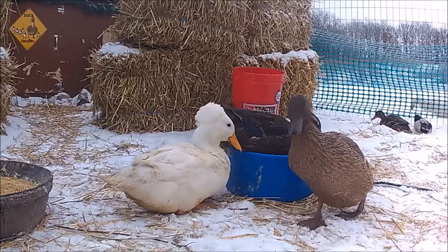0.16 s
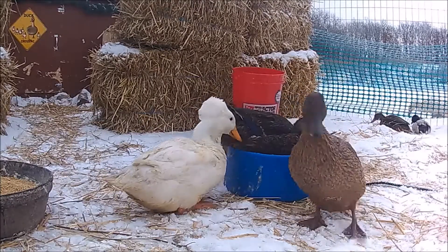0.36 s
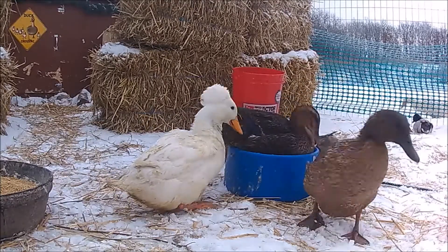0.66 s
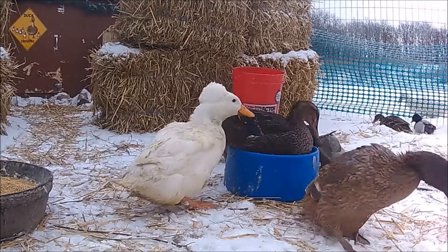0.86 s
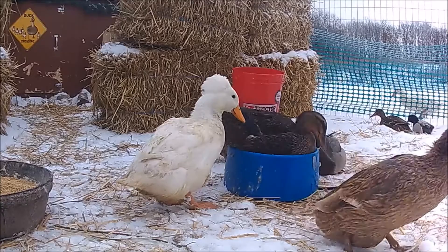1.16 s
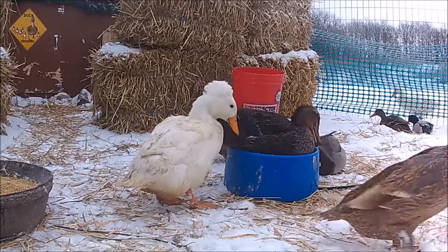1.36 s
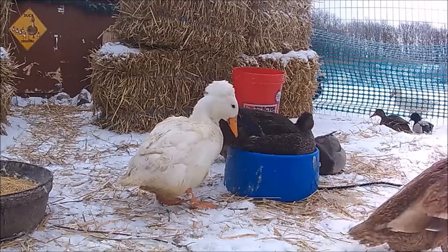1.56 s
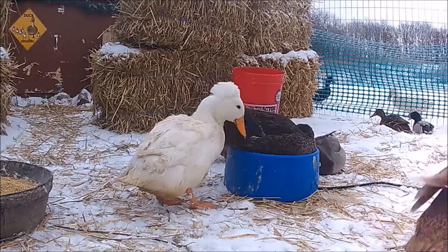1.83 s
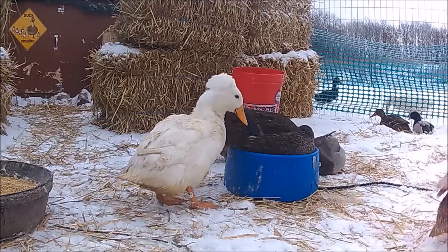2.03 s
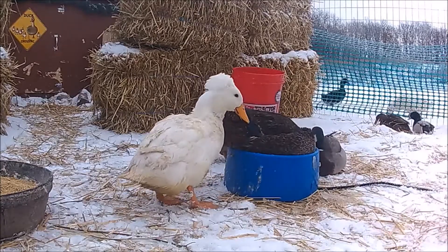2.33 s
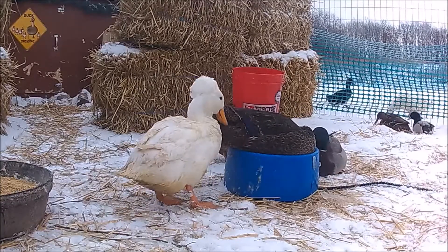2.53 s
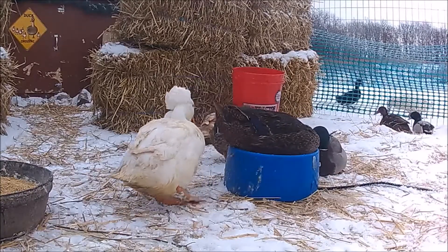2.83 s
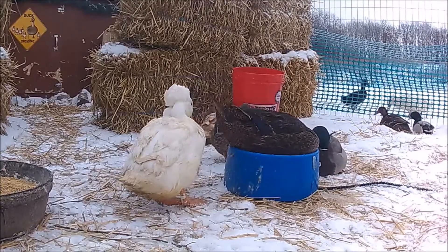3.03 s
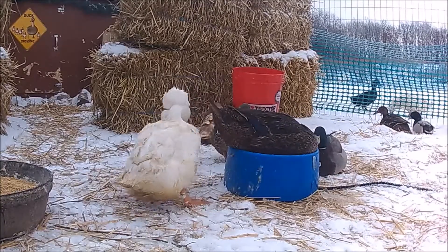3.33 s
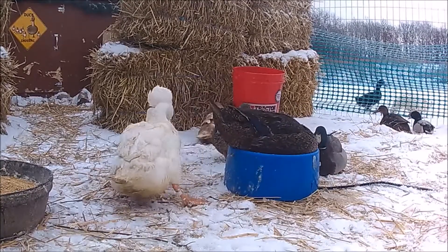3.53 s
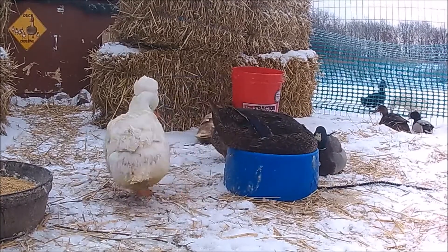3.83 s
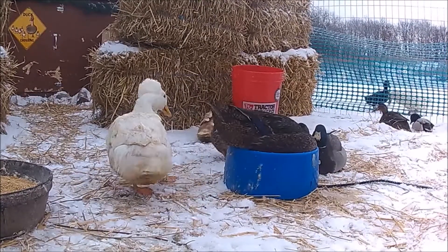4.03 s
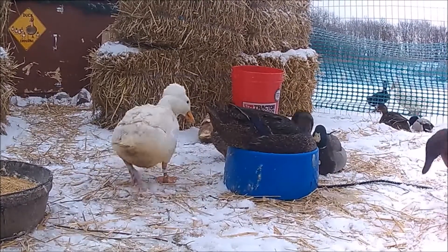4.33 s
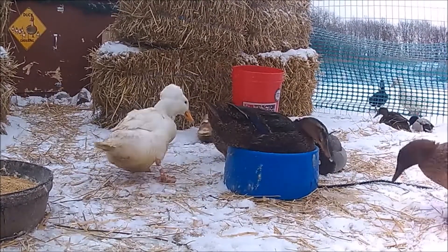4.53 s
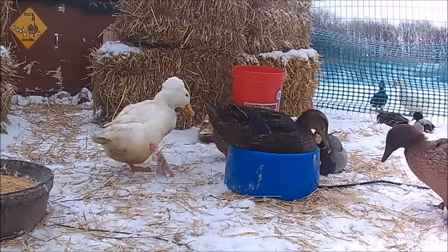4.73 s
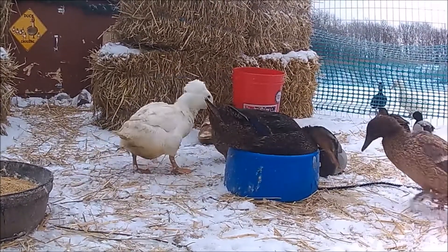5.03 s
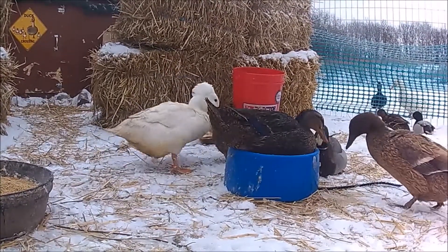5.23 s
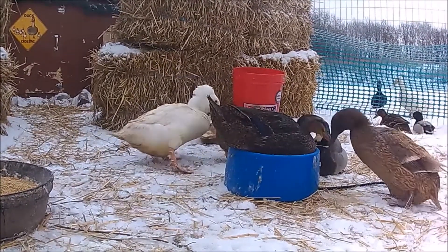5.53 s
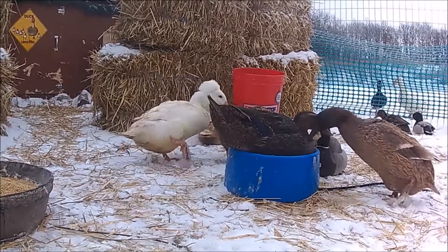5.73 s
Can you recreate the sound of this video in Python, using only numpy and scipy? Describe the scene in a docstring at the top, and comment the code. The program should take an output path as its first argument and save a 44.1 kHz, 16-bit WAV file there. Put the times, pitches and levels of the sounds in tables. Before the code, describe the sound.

A duck gives a short squeal, then a long whistled one that trembles, turns raspy and clears, amid creaky duck clucks and hard taps.

```python
"""One duck gives a long whistled squeal that trembles, turns raspy, swells clean and sinks away, after a short one:
harmonics picked by a throat resonance, beside rasp noise and a second voice. Ducks around it chatter in short
creaky clucks, pulse trains ringing throat and chest, with thin arching chirps. Hard taps land close to the
microphone, one faint and two sharp; crackling hiss comes in bouts of random ringing grains, with a few small clicks.
The far flock murmurs as fluttering noise over a faint hum and low rumble; the pen's echo is short and weak."""
import sys
import numpy as np
from scipy import signal
from scipy.fft import rfft, irfft, next_fast_len
from scipy.io import wavfile
from scipy.ndimage import map_coordinates

SR = 44100
rng = np.random.default_rng(int(sys.argv[2]) if len(sys.argv) > 2 else 0)


def waveform_to_disk(signal):
    """Save audio, clipped to [-1, 1], as 16-bit WAV at the path in sys.argv[1]."""
    frames = np.transpose(np.atleast_2d(signal))
    scaled = np.clip(frames, -1, 1) * 32767
    samples = np.round(scaled).astype(np.int16)
    wavfile.write(sys.argv[1], SR, samples)


N = 259749
TOP_HZ = 15900

# far flock spectrum: freq_hz, relative_db
FLOCK_SPECTRUM = [(59, -43), (100, -8.5), (398, -7), (801, -4.5), (991, -7.5), (1130, 1.5), (1230, 6),
                  (2220, 3.5), (2860, 0), (5080, -29), (5770, -62.5), (8280, -43.5), (10200, -27.5),
                  (13500, -27), (16000, -32)]
# rumble spectrum: freq_hz, relative_db
RUMBLE_SPECTRUM = [(20, -5.5), (45, -5), (60, 5), (80, -8.5), (150, -19.5), (300, -51.5)]
# faint low hum: freq_hz, level_db
HUM = (58, -78)
# late rumble swell: start_s, attack_s, hold_s, release_s
RUMBLE_SWELL = (4.2, .8, 1, .5)
FLOCK_START_DB, FLOCK_GROWS_DB_PER_S = -58.5, 0.59
RUMBLE_DB, RUMBLE_SWELL_DB = -83, 10.5

# echo of bales and shed: freq_hz, t60_s
PEN_DECAY = [(200, 0.22), (1800, 0.28), (6000, 0.12)]

# bouts of crackling hiss: start_s, hold_s, level_db
HISS_BOUTS = [(2.218, .6, -60), (3.24, 0.21, -51.5), (3.646, .24, -65.5), (4.059, 0.035, -61.5),
              (4.27, 0.063, -61), (4.942, .05, -67), (5.268, 0.048, -58)]
# small single clicks: start_s, peak_db
CLICKS = [(3.474, -39.5), (3.558, -29.5), (4.196, -37), (5.285, -40.5), (5.341, -35), (5.363, -31)]
# resonance of grains and clicks: freq_hz, relative_db
GRAIN_RESONANCE = [(1200, -21.5), (2200, 0), (3000, 5), (3700, -6), (4300, -8), (5200, -16.5),
                   (6200, -41.5), (8000, -39.5), (11000, -27.5), (15500, -29.5)]
BOUT_ATTACK_S, BOUT_RELEASE_S = .012, 0.16
HISS_FLOOR_DB = -71  # the hiss never falls silent

# close taps: start_s, level_db, rattle_t60_s, thump_level_db
TAPS = [(4.3145, -30, 0.051, -64), (4.3599, -1.5, 0.014, -41), (4.6331, 0.5, 0.015, -25)]
# struck body resonance: freq_hz, relative_db
TAP_RESONANCE = [(30, -43.5), (150, -13), (380, -8.5), (950, -9.5), (1350, 3), (1600, -3.5), (2000, -6),
                 (2800, 2), (3500, -6.5), (4600, -12), (5600, -35), (8000, -50), (10500, -37),
                 (15500, -41.5)]
# contacts within a tap: delay_s, level_db
BOUNCE = [(0, -5.5), (.0015, -8.5), (.0026, -11)]

# near clucks: loudest_s, peak_db (throat part), rise_s, fall_s, throat_hz
CLUCKS = [(0.006, -22.5, .003, .009, 1810), (0.1, -33.5, 0.024, .019, 1980),
          (0.271, -32.5, 0.0047, 0.013, 1610), (0.364, -36, .053, 0.026, 1528),
          (0.555, -43.5, 0.012, .009, 1640), (0.719, -15.5, 0.018, 0.0056, 1732),
          (0.856, -21, 0.0091, .004, 1748), (1.098, -21.5, 0.023, 0.0099, 1828),
          (1.192, -13.5, 0.024, .004, 1841), (1.243, -16.5, 0.025, .013, 1670),
          (1.304, -12.5, 0.029, .008, 1763), (1.43, -16, 0.013, 0.019, 1826),
          (1.516, -16.5, .019, .007, 1715), (1.938, -10, 0.039, .007, 1750),
          (2.135, -13.5, 0.013, .009, 1645), (2.358, -9.5, .032, 0.005, 1834),
          (4.082, -21, 0.019, 0.016, 1617), (4.106, -19.5, 0.0098, .018, 1682),
          (4.219, -17.5, .014, .004, 1830), (4.315, -21, .003, 0.026, 1498),
          (4.477, -30, 0.044, .008, 1560), (4.492, -21.5, 0.0044, 0.0031, 1814),
          (4.551, -30.5, .004, .005, 2030), (4.629, -17, .034, 0.028, 1734),
          (4.663, -11.5, 0.028, .01, 1965), (4.795, -19, 0.0076, 0.014, 1854),
          (4.924, -20, 0.014, .035, 1799), (4.994, -16, 0.023, .016, 1850), (5.172, -11, .027, 0.011, 1810),
          (5.317, -23, 0.026, 0.0049, 1800), (5.441, -34, .002, .011, 2015),
          (5.473, -19, .022, 0.014, 1949), (5.636, -29, 0.035, 0.06, 1710), (5.886, -26, .021, .003, 1730)]
# thin murmurs, nearly all throat: loudest_s, peak_db (throat part), rise_s, fall_s, throat_hz
MURMURS = [(5.215, -29, .017, 0.02, 1803), (5.272, -30, 0.045, 0.068, 1551),
           (5.362, -30.5, 0.025, 0.011, 1876), (5.553, -29, 0.03, .035, 1891)]
# throat resonance at THROAT_HZ: freq_hz, relative_db
THROAT_RESONANCE = [(700, -40), (1000, -37), (1250, -12.5), (1750, 2.5), (2150, -1.5), (2500, -14),
                    (3200, -36), (5000, -51.5), (6000, -77.5)]
# chest resonance: freq_hz, relative_db
CHEST_RESONANCE = [(60, -24), (150, -13), (260, -1), (420, -3.5), (700, 5), (1000, 3), (1500, -43)]
THROAT_HZ = 1844.5
# chest re throat in a cluck of CLUCK_DB; dB less per dB louder; dB more per Hz of higher throat
CLUCK_DB, CHEST_DB, CHEST_FADES_DB_PER_DB, CHEST_DB_PER_HZ = -20, -18.5, 0.67, 0.0227
MURMUR_CHEST_DB = -34
# creak at THROAT_HZ; power by which a higher throat slows it; log-normal spread
PULSES_PER_S, PULSE_SLOWS_POWER, PULSE_SCATTER = 210, 1.4, .04
# soft scattered clucks; the rise and fall also serve the leads
SOFT_PER_S, SOFT_DB, SOFT_RISE_S, SOFT_FALL_S, SOFT_HZ = 3.5, -40.5, 0.0064, 0.0052, 1830
# a soft cluck this much earlier and weaker leads each cluck rising faster than ABRUPT_S
LEAD_S, LEAD_DB, ABRUPT_S = .033, -22.5, 0.023

# thin arching chirps: middle_s, length_s, top_hz, sag_share, level_db
CHIRPS = [(1.21, .034, 1810, 0.24, -44), (1.495, .036, 1785, 0.23, -43.5), (1.504, 0.023, 2070, 0.3, -37),
          (1.742, 0.044, 2113, 0.3, -37), (2.108, 0.047, 2332, 0.5, -37.5), (2.125, 0.015, 1808, .15, -25)]

# whistle level, short squeal: time_s, level_db
SHORT_LEVEL = [(1.73, -38.5), (1.752, -40.5), (1.772, -27.5), (1.915, -25)]
# whistle level, long squeal: time_s, level_db
LONG_LEVEL = [(2.15, -34), (2.154, -36.5), (2.186, -19), (2.3, -25.5), (2.312, -18.5), (2.35, -19),
              (2.462, -24.5), (2.604, -23.5), (2.918, -40.5), (2.938, -31), (2.994, -26), (3.156, -25.5),
              (3.24, -17), (3.456, -14.5), (3.524, -16), (3.594, -30), (3.65, -49)]
# whistle level, hoarse end of the long squeal: time_s, level_db
END_LEVEL = [(3.68, -38), (3.708, -34), (3.802, -40.5), (3.884, -23.5), (3.948, -37.5), (3.96, -38.5)]
# short squeal pitch: time_s, pitch_hz
SHORT_PITCH = [(1.73, 560), (1.755, 622), (1.77, 700.3), (1.915, 720.5)]
# long squeal pitch: time_s, pitch_hz
LONG_PITCH = [(2.17, 737.8), (2.208, 756.7), (2.26, 834.9), (2.314, 737.0), (2.534, 762.9), (2.688, 760.6),
              (2.782, 775.4), (2.864, 748.3), (3.202, 732.4), (3.52, 709.5), (3.58, 691.5)]
# pitch as the voice breaks and sags: time_s, pitch_hz
END_PITCH = [(3.6, 652), (3.7, 592), (3.786, 556), (3.826, 509), (3.872, 487)]
# resonance that picks one harmonic: freq_hz, relative_db
WHISTLE_RESONANCE = [(900, -36), (1150, 12), (1400, 23), (1600, 12.5), (1750, 7.5), (2000, -60)]
# harmonic just above the whistle: freq_hz, relative_db
OVERTONE_RESONANCE = [(1650, -48.5), (1950, 7.5), (2300, 6), (2550, -9.5), (2800, -51)]
# reedy top of a pressed voice: freq_hz, relative_db
REEDY_RESONANCE = [(2400, -47), (2950, 1.5), (3300, -6), (3750, -7), (4500, -14), (5200, -10), (5500, -54)]
# rasp spectrum: freq_hz, relative_db
RASP_SPECTRUM = [(500, -49.5), (950, -25), (1200, -12.5), (1450, 6.5), (1650, -9), (2000, -6), (2400, -29),
                 (3200, -23), (4300, -43.5), (5200, -48), (6000, -75)]
# trembling rate: time_s, beats_per_s
TREMBLE = [(2.42, 45), (2.48, 41), (2.52, 34), (2.6, 32), (2.65, 36), (2.72, 30)]
TREMBLE_CREST_S = 2.55
# moments when the voice cracks: middle_s, added_rasp_share
CRACKS = [(1.92, .25), (2.156, 1), (2.25, .15), (2.293, 0.4), (3.36, 0.16), (3.928, 0.75)]
CRACK_S = 0.016
# stages of the long squeal, each: start_s, attack_s, hold_s, release_s
PRESSED = (2.14, 0.023, 0.68, 0.054)
TREMBLING = (2.38, .15, .17, 0.13)
TWO_VOICED = (2.69, .09, .01, 0.017)
# stage free of background quiver: start_s, attack_s, hold_s, release_s
CLEAN_SWELL = (2.8, .1, 0.59, .05)
# harmonics beside the whistle, each: level_db (whistle at WHISTLE_DB), db_per_whistle_db, pressed_db
FUNDAMENTAL = (-54.5, 0.049, 9.3)
OVERTONE = (-47, 0.38, -9.5)
WHISTLE_DB = -25
# clean while a harmonic lies within LOCK_WIDTH (harmonic spacings) of the throat's pitch
THROAT_LOCK_HZ, LOCK_WIDTH, LOCK_EDGE = 1472, .21, .14
# rasp shares: always present, added when unlocked, by the tremble, by the second voice
CLEAN_RASP, FULL_RASP, TREMBLE_RASP, TWO_VOICED_RASP = .006, 0.95, .16, 0.52
# tremble depth; least depth outside the clean swell; second voice alone and while trembling
TREMBLE_DEPTH, QUIVER_DEPTH, SECOND_VOICE, TREMBLE_SECOND = 0.63, 0.19, 1, 0.12
# above STRAIN_HZ and below SLACK_HZ the harmonics beside the whistle fade
STRAIN_HZ, STRAIN_DB_PER_HZ = 817, 1.3
SLACK_HZ, SLACK_DB_PER_HZ = 576, 1.5


def amp(db):
    """Decibels to gain."""
    return 10 ** (np.asarray(db) / 20)


def unit(x):
    """Scale to rms 1."""
    return x / np.sqrt(np.mean(x ** 2) + 1e-20)


def along(points, hz):
    """Read (freq_hz, value) points on a log axis."""
    freq_hz, values = np.transpose(points)
    return np.interp(np.log(hz + 1), np.log(freq_hz + 1), values)


def curves(rows):
    """One value per sample for each column after the time."""
    time_s, *columns = np.transpose(rows)
    return [np.interp(np.arange(N) / SR, time_s, column) for column in columns]


def wobble(knots_per_s):
    """Smooth random curve."""
    knots = rng.standard_normal(int(N * knots_per_s / SR) + 4)
    return map_coordinates(knots, [np.arange(N) * knots_per_s / SR])


def envelope(start_s, attack_s, hold_s, release_s):
    """Rise to 1, stay, fall back to 0."""
    t = np.arange(N) / SR - start_s
    return np.clip(np.minimum(t / attack_s, 1 - (t - attack_s - hold_s) / release_s), 0, 1)


def filtered(x, response):
    """Multiply the spectrum of x by a response of frequency."""
    size = next_fast_len(N + SR // 2)
    return irfft(rfft(x, size) * response(np.fft.rfftfreq(size, 1 / SR)), size)[:N]


def noise(spectrum):
    """Coloured noise of rms 1."""
    return unit(filtered(rng.standard_normal(N), lambda hz: amp(along(spectrum, hz))))


def ring(spectrum, shift=1, size=2048):
    """Minimum-phase answer of a body to one impulse, with peak 1."""
    hz = np.fft.rfftfreq(size, 1 / SR) / shift
    cepstrum = irfft(np.log(amp(along(spectrum, hz))))
    # folding the cepstrum makes the answer causal
    cepstrum[1:size // 2] *= 2
    cepstrum[size // 2 + 1:] = 0
    answer = irfft(np.exp(rfft(cepstrum)))
    return answer / np.abs(answer).max()


def add(track, start_s, sound):
    """Mix a sound into the track."""
    start = round(start_s * SR)
    lo, hi = max(start, 0), min(start + len(sound), N)
    if hi > lo:
        track[lo:hi] += sound[lo - start:hi - start]


def background(flutter_db):
    """Far flock as fluttering noise that slowly livens up, a faint hum, and a rumble that swells late."""
    t = np.arange(N) / SR
    flock_db = FLOCK_START_DB + FLOCK_GROWS_DB_PER_S * t + flutter_db * wobble(23)
    flock = amp(flock_db) * noise(FLOCK_SPECTRUM)
    hum_hz, hum_db = HUM
    hum = amp(hum_db) * np.sqrt(2) * np.sin(2 * np.pi * hum_hz * t)
    rumble_db = RUMBLE_DB + RUMBLE_SWELL_DB * envelope(*RUMBLE_SWELL)
    return flock + hum + amp(rumble_db) * noise(RUMBLE_SPECTRUM)


def pen_echo(x):
    """Short echo, 10 ms late, in which each frequency dies at its own speed."""
    hz, t, cells = signal.stft(rng.standard_normal(SR // 2), SR, nperseg=256)
    decay = amp(-60 * t / along(PEN_DECAY, hz)[:, None])
    tail = signal.istft(cells * decay, SR, nperseg=256)[1]
    delayed = np.pad(x, (SR // 100, 0))
    return signal.fftconvolve(delayed, tail / np.linalg.norm(tail))[:N]


def crackling_hiss(grains_per_s, clump_db):
    """Random impulses, clumped in level, ring a resonance in bouts; a few small clicks share it."""
    grains = (rng.random(N) < grains_per_s / SR) * rng.standard_normal(N)
    grain_ring = ring(GRAIN_RESONANCE)
    bouts = [amp(level_db) * envelope(start_s, BOUT_ATTACK_S, hold_s, BOUT_RELEASE_S)
             for start_s, hold_s, level_db in HISS_BOUTS]
    level = np.maximum(np.max(bouts, axis=0), amp(HISS_FLOOR_DB))
    crackle = unit(signal.fftconvolve(grains * amp(clump_db * wobble(35)), grain_ring)[:N])
    out = crackle * level
    for start_s, peak_db in CLICKS:
        add(out, start_s, amp(peak_db) * grain_ring)
    return out


def taps(rattle_db, thump_s):
    """Hard bouncing contacts and a decaying rattle ring a struck body; each adds a low push of air."""
    out, t, body = np.zeros(N), np.arange(SR // 20) / SR, ring(TAP_RESONANCE)
    for start_s, level_db, rattle_t60_s, thump_db in TAPS:
        blow = amp(rattle_db - 60 * t / rattle_t60_s) * rng.standard_normal(len(t))
        for delay_s, contact_db in BOUNCE:
            blow[round(abs(delay_s) * SR)] += amp(contact_db)
        tap = signal.fftconvolve(blow, body)
        tap *= np.linalg.norm(body) / np.linalg.norm(tap)  # same energy as the body's ring
        add(out, start_s, amp(level_db) * np.sqrt(2) * tap)
        u = t / thump_s
        add(out, start_s, amp(thump_db) * u * (2 - u) * np.exp(-u))
    return out


def chirps(quaver):
    """Each chirp arches up and down in pitch as it swells and fades."""
    out, waver = np.zeros(N), wobble(700)
    for middle_s, length_s, top_hz, sag, level_db in CHIRPS:
        u = np.linspace(-1, 1, round(length_s * SR))
        pitch_hz = top_hz * (1 - sag * u ** 2 + quaver * waver[round(middle_s * SR):][:len(u)])
        tone = np.cos(np.pi * u / 2) * np.sin(2 * np.pi * np.cumsum(pitch_hz) / SR)
        add(out, middle_s - length_s / 2, amp(level_db) * np.sqrt(2) * tone)
    return out


def cluck_pulses(rise_s, fall_s, pulses_per_s, edge_db, puff_db, puff_t60_s):
    """Snaps of the syrinx that swell to a central one and fade; each trails a short noisy puff."""
    chance = rng.standard_normal((2, 64))
    before, after = min(int(rise_s * pulses_per_s), 31), min(int(fall_s * pulses_per_s), 31)
    k = np.arange(-before, after + 1)
    # the central pulse (k = 0) has no scatter
    when_s = (k + .06 * chance[0, k] * (k != 0)) / pulses_per_s
    scatter_db = 1.6 * chance[1, k] * (k != 0)
    edge = np.abs(when_s / np.where(k < 0, rise_s, fall_s)) ** 1.63
    train = np.zeros(SR // 4)
    place = np.round(when_s * SR).astype(int) + SR // 8
    train[np.clip(place, 0, len(train) - 1)] = amp(scatter_db - edge_db * edge)
    t = np.arange(SR // 50) / SR
    puff = signal.fftconvolve(train, amp(-60 * t / puff_t60_s))[:len(train)]
    return train + amp(puff_db) * puff * rng.standard_normal(len(train))


def cluck(peak_db, rise_s, fall_s, throat_hz, chest_db):
    """A pulse train rings the throat, and more weakly the chest; a higher throat creaks more slowly."""
    slowing = (THROAT_HZ / throat_hz) ** PULSE_SLOWS_POWER
    rate = PULSES_PER_S * slowing * np.exp(PULSE_SCATTER * rng.standard_normal())
    train = cluck_pulses(rise_s, fall_s, rate, edge_db=14.0, puff_db=-19, puff_t60_s=0.021)
    throat = signal.fftconvolve(train, ring(THROAT_RESONANCE, throat_hz / THROAT_HZ))
    chest = unit(signal.fftconvolve(train, ring(CHEST_RESONANCE))) * throat.std() * amp(chest_db)
    return amp(peak_db) * (throat + chest) / np.abs(throat).max()


def soft_clucks():
    """Rows of faint clucks: one leads each abrupt cluck, others come at jittered intervals."""
    rows = [(loudest_s - LEAD_S, peak_db + LEAD_DB, SOFT_RISE_S, SOFT_FALL_S, throat_hz)
            for loudest_s, peak_db, rise_s, _, throat_hz in CLUCKS if rise_s < ABRUPT_S]
    chance = rng.uniform(-1, 1, (64, 3))
    for i, (u, v, w) in enumerate(chance):
        if i < np.floor(SOFT_PER_S * N / SR):
            loudest_s, throat_hz = (i + u / 2) / SOFT_PER_S, SOFT_HZ * (1 + 0.033 * w)
            rows.append((loudest_s, SOFT_DB + 3 * v, SOFT_RISE_S, SOFT_FALL_S, throat_hz))
    return rows


def clucks():
    """Near ducks' chatter; the softer a cluck, the larger its share of chest."""
    out, middle_s = np.zeros(N), 1 / 8 + .0004  # central pulse, plus the throat's lag
    for loudest_s, peak_db, rise_s, fall_s, throat_hz in CLUCKS + soft_clucks():
        chest_db = CHEST_DB - CHEST_FADES_DB_PER_DB * (peak_db - CLUCK_DB)
        chest_db += CHEST_DB_PER_HZ * (throat_hz - THROAT_HZ)
        add(out, loudest_s - middle_s, cluck(peak_db, rise_s, fall_s, throat_hz, chest_db))
    for loudest_s, *shape in MURMURS:
        add(out, loudest_s - middle_s, cluck(*shape, MURMUR_CHEST_DB))
    return out


def hoarseness(pitch_hz, unsteady):
    """Share of rasp: high when no harmonic fits the throat or in a crack, raised by unsteadiness."""
    t, harmonic = np.arange(N) / SR, THROAT_LOCK_HZ / pitch_hz
    miss = np.abs(harmonic - np.round(harmonic))
    unlocked = np.clip((miss - LOCK_WIDTH) / LOCK_EDGE, 0, 1)
    cracks = sum(share * np.exp(-((t - middle_s) / CRACK_S) ** 2) for middle_s, share in CRACKS)
    return np.clip(CLEAN_RASP + FULL_RASP * unlocked + unsteady + cracks, 0, .98)


def squeal(level_rows, second_hz, jitter, vibrato, flicker_db, rasp_db, overtone_db, reedy_db):
    """A throat picks out one harmonic of a high voice; the other side of the syrinx beats against it."""
    t = np.arange(N) / SR
    pitch_hz, = curves(SHORT_PITCH + LONG_PITCH + END_PITCH)
    whistle_db, = curves(level_rows)
    press, trembling, two_voiced = envelope(*PRESSED), envelope(*TREMBLING), envelope(*TWO_VOICED)

    thinning_db = SLACK_DB_PER_HZ * np.maximum(SLACK_HZ - pitch_hz, 0)
    thinning_db += STRAIN_DB_PER_HZ * np.maximum(pitch_hz - STRAIN_HZ, 0)
    low_db, high_db = [level_db + follows * (whistle_db - WHISTLE_DB) + pressed_db * press - thinning_db
                       for level_db, follows, pressed_db in (FUNDAMENTAL, OVERTONE)]
    quiver = QUIVER_DEPTH * (1 - envelope(*CLEAN_SWELL))
    depth = np.clip(np.maximum(TREMBLE_DEPTH * trembling, quiver), 0, 1)
    rasp = hoarseness(pitch_hz, TREMBLE_RASP * trembling + TWO_VOICED_RASP * two_voiced)
    clean = np.sqrt(1 - rasp ** 2)
    second = np.maximum(SECOND_VOICE * two_voiced, TREMBLE_SECOND * trembling)
    first_s, last_s = level_rows[0][0], level_rows[-1][0]
    gate = np.clip(np.minimum(t - first_s, last_s - t) / 0.0025, 0, 1)
    on = gate > 0

    # once a beat the voice chokes briefly, bends in pitch and lets the rasp through
    beats = np.cumsum(curves(TREMBLE)[0]) / SR
    turn = 2 * np.pi * (beats - np.interp(TREMBLE_CREST_S, t, beats))
    dip = np.sin(turn / 2) ** 4
    swell = (1 - depth * dip) / (1 - depth / 3)
    rough_gain = 1 - depth + 2.6 * depth * dip
    bend = vibrato * np.sqrt(depth) * np.sin(turn) + jitter * (1 + 6 * rasp) * wobble(300)
    phase = 2 * np.pi * np.cumsum(pitch_hz * (1 + bend)) / SR

    k = np.arange(2, 9)[:, None]
    partials = np.sin(k * phase[on])
    flicker = np.array([wobble(30)[on] for _ in k[2:]])
    partials[2:] *= amp(flicker_db * flicker)  # harmonics 4 and up come and go

    def through(spectrum):
        """Harmonics weighted by a resonance, at a nominal rms of 1."""
        gains, out = amp(along(spectrum, k * pitch_hz[on])), np.zeros(N)
        out[on] = (gains * partials).sum(0) / np.sqrt((gains ** 2).sum(0) / 2)
        return out

    # the second voice puts side tones on both sides of the whistle
    other = 2 * np.pi * np.cumsum(second_hz * (1 + 0.14 * wobble(220))) / SR
    sides = np.sin(2 * phase + other) + 0.42 * np.sin(2 * phase - other)
    whistle = clean * swell * through(WHISTLE_RESONANCE)
    rough = rough_gain * (amp(rasp_db) * rasp * noise(RASP_SPECTRUM) + second * sides)
    # pressing the voice brings out the fundamental and the reedy top together
    fundamental = np.sqrt(2) * swell * np.sin(phase)
    reedy = amp(reedy_db) * (1 - rasp) ** 2 * through(REEDY_RESONANCE)
    pressed = amp(low_db) * clean * (fundamental + reedy)
    overtones = amp(high_db + overtone_db) * (1 - rasp) ** 2 * through(OVERTONE_RESONANCE)
    return gate * (amp(whistle_db) * (whistle + rough) + pressed + overtones)


def scene():
    """Background, crackling hiss, taps, and the near ducks with their echo."""
    far = background(flutter_db=3.0)
    hiss = crackling_hiss(grains_per_s=1700, clump_db=2.0)
    knocks = taps(rattle_db=-14.5, thump_s=0.001)
    chatter = chirps(quaver=0.036) + clucks()
    call = sum(squeal(rows, second_hz=388, jitter=0.0011, vibrato=0.026, flicker_db=2.0,
                      rasp_db=1.5, overtone_db=2, reedy_db=-11)
               for rows in (SHORT_LEVEL, LONG_LEVEL + END_LEVEL))
    echo = amp(-21.5) * pen_echo(chatter + call / 2)
    return (far + hiss + knocks + chatter + call + echo)[None]


def record(dry):
    """Keep only what lies below the band limit."""
    return filtered(dry[0], lambda hz: hz < TOP_HZ)[None]


dry = scene()
out = record(dry)
waveform_to_disk(out)
```